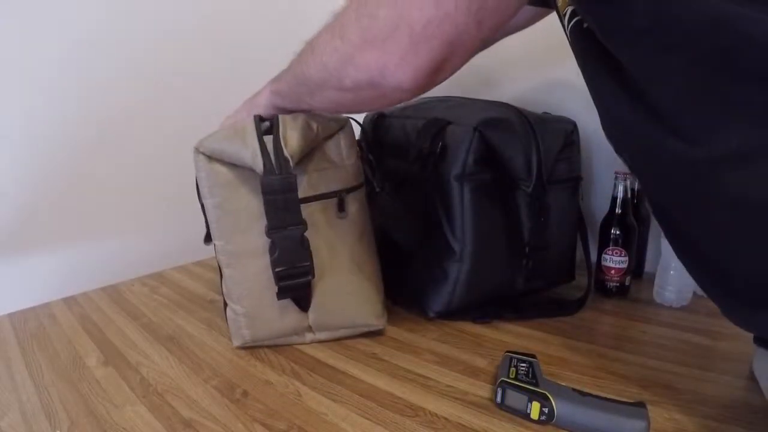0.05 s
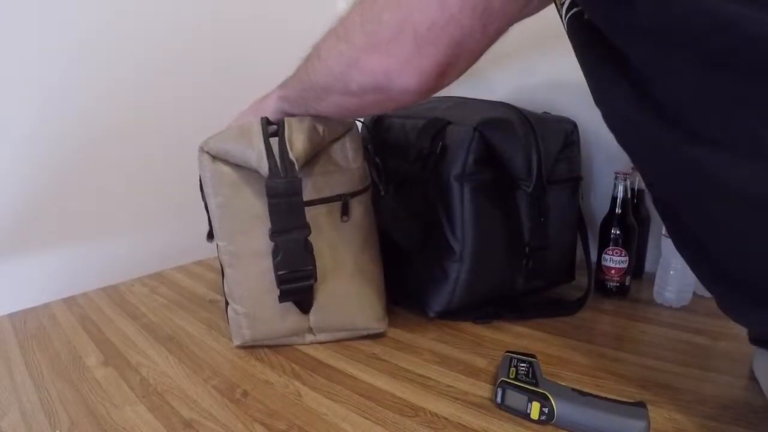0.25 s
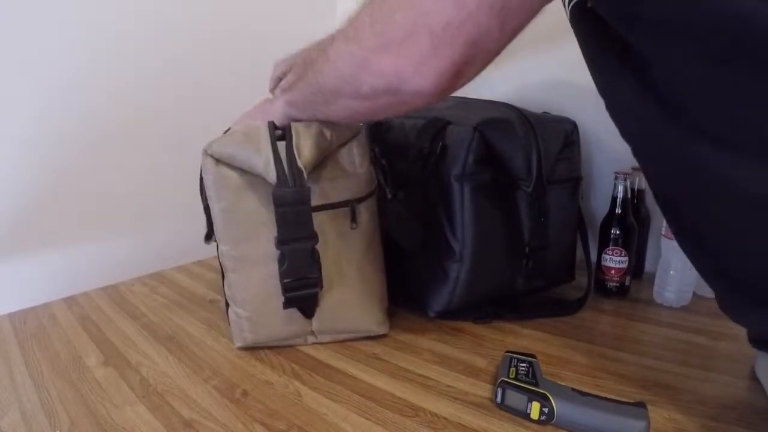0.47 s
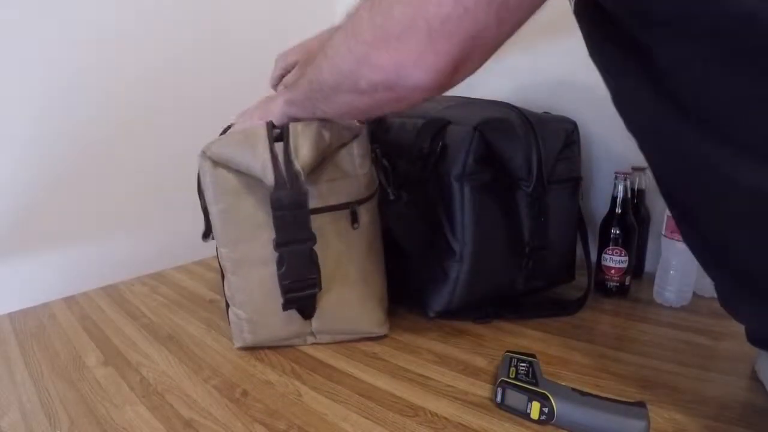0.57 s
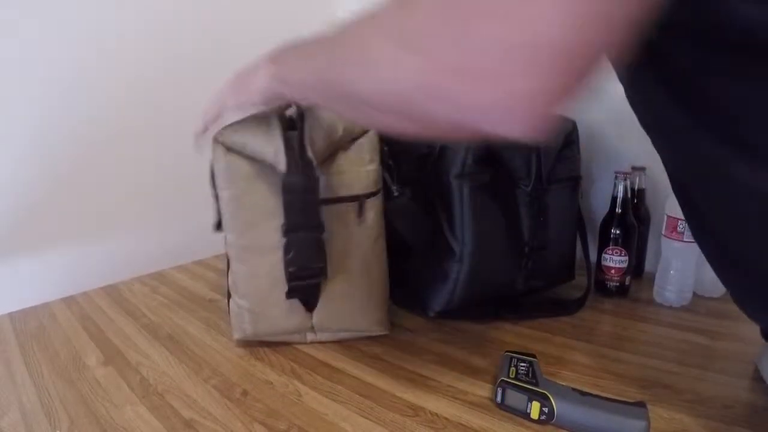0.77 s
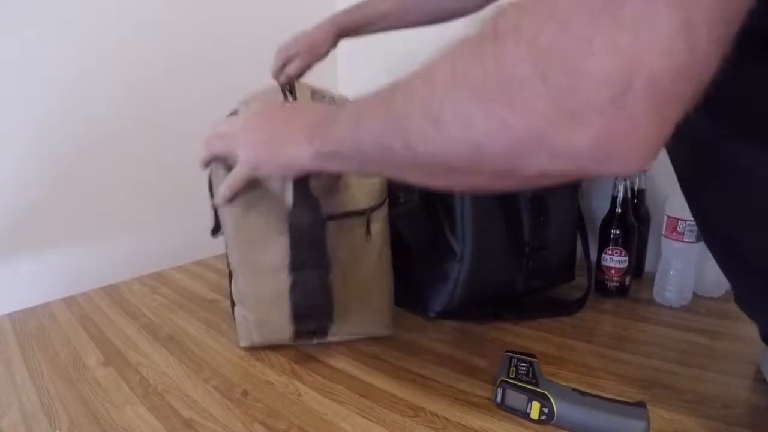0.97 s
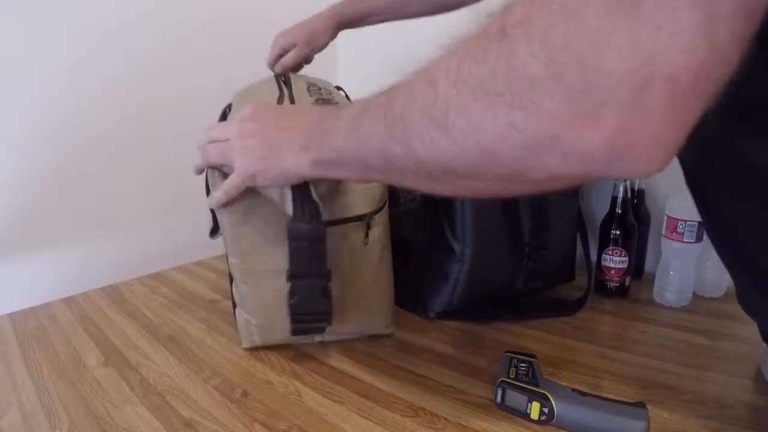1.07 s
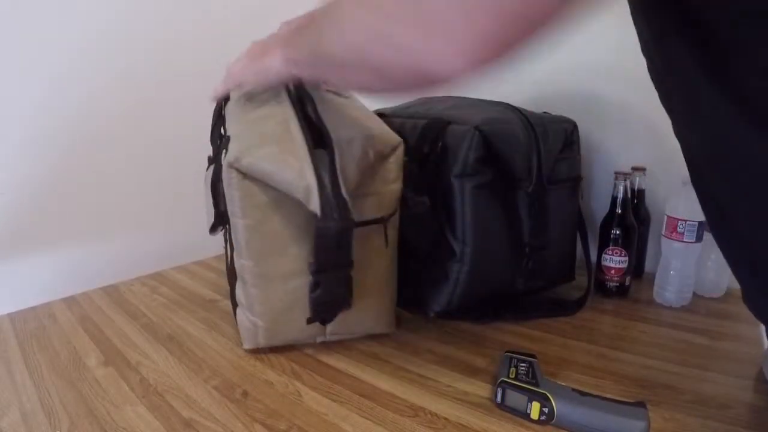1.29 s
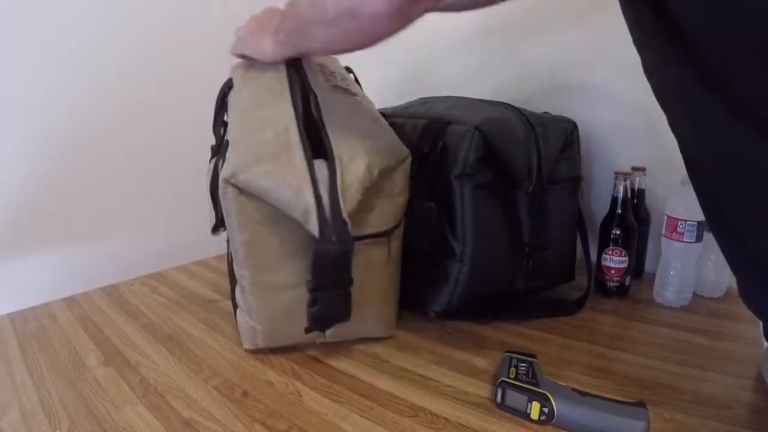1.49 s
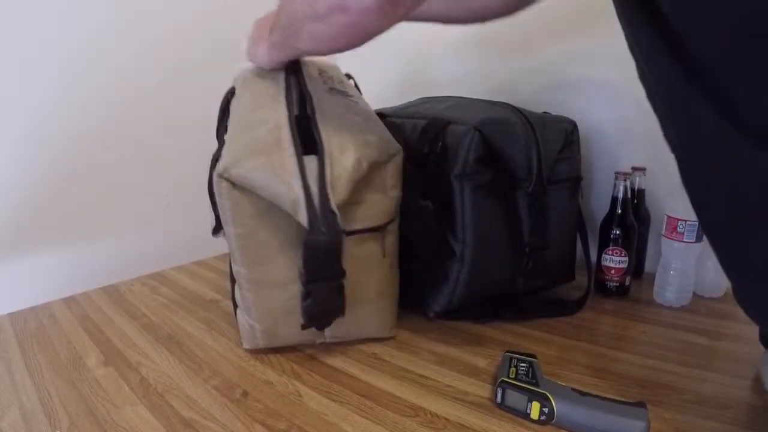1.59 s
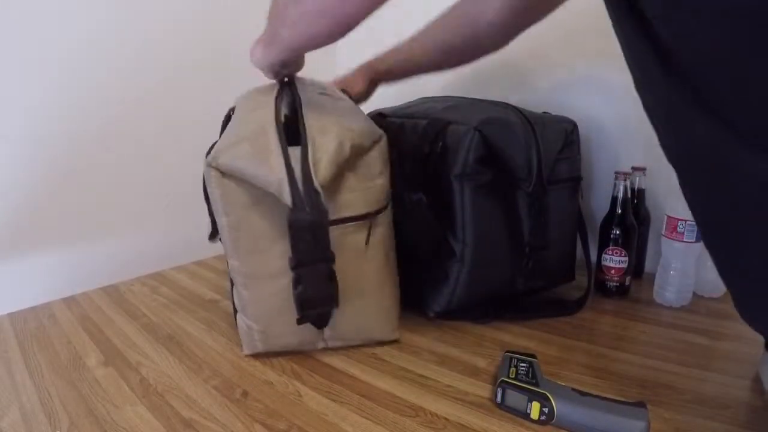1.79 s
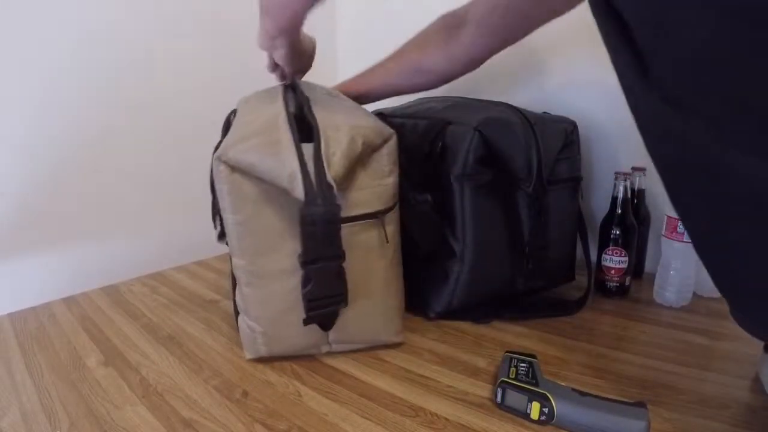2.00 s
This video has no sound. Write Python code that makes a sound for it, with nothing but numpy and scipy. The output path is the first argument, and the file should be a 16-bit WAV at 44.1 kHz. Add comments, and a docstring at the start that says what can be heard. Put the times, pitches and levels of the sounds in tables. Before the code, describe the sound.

Stiff bag fabric rustles and creases under hands; the base judders loudly across a wooden table, then soft knocks, small zipper ticks and one sharp buckle click, close mono microphone in a small bare room.

```python
"""A wooden table in a small bare room: hands press and drag a stiff soft-cooler across it, and a small
camera stands close by on the same table-top, its one microphone hearing everything in mono.
The wood carries sway, rocking, dragging, judders and dull knocks, made of resonant noise and sine modes.
Fabric rustles and creases in filtered grains and noise; zipper ticks and a buckle click ring as short modes,
a noisy tail fades after the click, and thin squeaks, a tiny rattle, room hiss and two faint tones join."""
import sys
import numpy as np
from scipy import signal
from scipy.fft import rfft, irfft
from scipy.io import wavfile
from scipy.ndimage import uniform_filter1d

SR = 44100
rng = np.random.default_rng(int(sys.argv[2]) if len(sys.argv) > 2 else 0)


def to_wav(sig):
    """Store sig (one row per channel, or 1-D mono) as 16-bit WAV at the path in sys.argv[1].

    Samples outside -1..1 are clipped; the rate is SR.
    """
    pcm = np.clip(np.atleast_2d(sig), -1, 1) * 32767
    pcm = np.round(pcm).astype(np.int16)
    wavfile.write(sys.argv[1], SR, pcm.T)  # frames by channels


def field_ratio(decibels):
    """Amplitude ratio for a level in dB (20 dB per decade); scalars and array-likes work."""
    return 10 ** (np.asarray(decibels, dtype=float) / 20)


N = 90404  # length [samples]


def col(table, k):
    """Column k of a time table as a per-sample curve."""
    a = np.array(table, float)
    return np.interp(np.arange(N) / SR, a[:, 0], a[:, k])


def unit(x):
    """Scale to rms 1."""
    return x / np.sqrt(np.mean(x ** 2))


def band(x, hz, width):
    """Two-pole resonance."""
    return signal.lfilter(*signal.iirpeak(min(hz, .45 * SR), max(hz / width, .3), SR), x)


def noise_band(hz, width):
    """Steady noise through the same resonance twice, rms 1."""
    return unit(band(band(rng.standard_normal(N), hz, width), hz, width))


def walk(rate):
    """Smooth random curve, spread 1, with a new target rate times a second."""
    k = int(SR / rate)
    steps = np.repeat(rng.standard_normal(N // k + 1), k)
    return unit(uniform_filter1d(uniform_filter1d(steps, k), k)[:N])


def grains(per_s, spread_db):
    """Random clicks of both signs with a long-tailed but bounded size, rms 1."""
    happens = rng.random(N) < per_s / SR
    size = field_ratio(spread_db * np.minimum(rng.exponential(size=N), 2.5))
    return unit(happens * np.sign(rng.standard_normal(N)) * size)


def add(out, s, x):
    """Mix x in at time s."""
    i = int(s * SR)
    out[i:i + len(x)] += x[:N - i]


def ring(hz, t60, rise=0.):
    """A decaying mode, starting downwards, faded in over rise seconds."""
    t = np.arange(int(t60 * SR)) / SR
    decay = np.exp(-np.log(1000) * t / t60)
    return -np.sin(2 * np.pi * hz * t) * decay * np.minimum(t / (rise + 1e-9), 1)


def trains(rows):
    """Short tones that swell and fade, each slightly off its nominal pitch."""
    out = np.zeros(N)
    for (centre, length, db, hz), c in zip(rows, rng.standard_normal(len(rows))):
        t = np.arange(int(length * SR)) / SR
        phase = 2 * np.pi * hz * (1 + 0.0048 * c) * (t - length / 2)
        swell = np.sin(np.pi * t / length) ** 1.5
        add(out, centre - length / 2, field_ratio(db) * swell * np.cos(phase))
    return out


def ring_contacts(contacts, modes):
    """Metal contacts that each ring every mode, with level, pitch and sign a little different each time."""
    out = np.zeros(N)
    for s, db in contacts:
        for hz, mode_db, t60 in modes:
            a, b = rng.standard_normal(2)
            mode = ring(hz * (1 + .012 * b), t60, rise=.0002)
            add(out, s, np.sign(b) * field_ratio(db + mode_db + 1.5 * a) * mode)
    return out


# quiet air of the room at the microphone: (frequency [Hz], relative level per Hz [dB])
HISS_SPECTRUM = [(35, -30), (60, 25), (145, -4), (167, -22), (546, -14.5), (738, -41.5), (1350, -24),
                 (1520, -16.5), (4850, -18), (15500, -22.5)]
HISS_DB = -72  # rms of the part above 1 kHz


def room_hiss():
    """Steady room noise, shaped as a spectrum read on a log frequency axis."""
    f = np.fft.rfftfreq(N, 1 / SR) + 1  # 1 Hz offset keeps the log finite
    hz, db = np.array(HISS_SPECTRUM, float).T
    shape = field_ratio(np.interp(np.log(f), np.log(hz), db)) * (f > 50)
    spectrum = rfft(rng.standard_normal(N)) * shape
    upper = irfft(spectrum * (f > 1000), N)
    return irfft(spectrum, N) / np.sqrt(np.mean(upper ** 2)) * field_ratio(HISS_DB)


# two faint tones in the background: (frequency [Hz], rms level [dB])
WHINE_TONES = [(8629, -87), (8662, -87.5)]


def whine():
    """Two steady sines close enough in pitch to beat."""
    t = np.arange(N) / SR
    return sum(np.sqrt(2) * field_ratio(db) * np.sin(2 * np.pi * hz * t) for hz, db in WHINE_TONES)


# table sway under the hands: (time [s], level [dB])
SWAY_LEVEL = [(0, -35.5), (.04, -47.5), (.15, -45), (.19, -47), (.3, -52), (.37, -45.5), (.51, -42),
              (.62, -52), (.66, -49), (.99, -57), (1.06, -50.5), (1.1, -52.5), (1.14, -50), (1.3, -52.5),
              (1.4, -60), (1.44, -50), (1.47, -61), (1.7, -51), (1.74, -63), (1.82, -48.5), (1.99, -56),
              (2.05, -54.5)]
# low resonances of the swaying table: (frequency [Hz], width [Hz], relative level [dB])
SWAY_RESONANCES = [(25.9, 8.7, 4), (51.8, 17.2, -3), (71.5, 20.5, -17)]


def table_sway():
    """The hands' pushing as noise in the table's lowest resonances."""
    sway = unit(sum(field_ratio(db) * noise_band(hz, width) for hz, width, db in SWAY_RESONANCES))
    return sway * field_ratio(col(SWAY_LEVEL, 1))


# bag dragging on the table-top: (time [s], level [dB], extra level of the low modes [dB])
DRAG_LEVEL = [(0, -67, 7.5), (.18, -65, 10), (.21, -53, 9), (.255, -62, 0), (.27, -51, 1), (.31, -45, 0.5),
              (.42, -47.5, -1.5), (.47, -40, -11), (.5, -30.5, -7.5), (.53, -38.5, -3), (.57, -40.5, -4),
              (.61, -44, 0), (.66, -45, -3.5), (.72, -57.5, 7.5), (.77, -50.5, -2.5), (.86, -55, 8),
              (.94, -54.5, -0.5), (.97, -51, 6), (1.07, -53, 1.5), (1.11, -64.5, 12.5), (1.16, -54.5, 1.5),
              (1.21, -56.5, 2), (1.25, -64, -1), (1.39, -70, 12), (1.42, -57.5, 13), (1.5, -58, 4.5),
              (1.6, -57, -7), (1.63, -57.5, 9), (1.72, -55, 2), (1.77, -64, 7), (1.84, -59, 10.5),
              (1.93, -64.5, 6.5), (1.99, -64.5, 9.5), (2.05, -52, 2)]
# lowest modes of the wood: (frequency [Hz], width [Hz], relative level [dB])
LOW_WOOD_MODES = [(104.8, 17.5, -7.5), (164.8, 32.3, -9)]
# higher modes of the table-top: (frequency [Hz], width [Hz], relative level [dB])
TOP_WOOD_MODES = [(245.6, 45, -2.5), (330, 177, -5.5), (400.8, 53, -2), (476.3, 34.6, -10), (626, 89, -18)]
DRAG_PER_S, DRAG_SPREAD_DB = 900, 2.5  # grains per second, spread of their size


def wood_modes(rubbing, rows):
    """The rubbing heard through a row of wood modes of alternating sign."""
    out = np.zeros(N)
    for k, (hz, width, db) in enumerate(rows):
        mode = unit(band(band(rubbing, hz, width), hz, 3 * width))
        out += (-1) ** k * field_ratio(db) * mode
    return out


def dragging():
    """Friction grains and noise exciting the modes of the table-top."""
    rubbing = grains(DRAG_PER_S, DRAG_SPREAD_DB) + 0.41 * rng.standard_normal(N)
    low = field_ratio(col(DRAG_LEVEL, 2)) * wood_modes(rubbing, LOW_WOOD_MODES)
    return field_ratio(col(DRAG_LEVEL, 1)) * (wood_modes(rubbing, TOP_WOOD_MODES) + low)


# fabric rustle: (time [s], level before tilt [dB], low tilt [dB], high tilt [dB]);
# the low tilt sets in below 2 kHz, full by 1 kHz; the high one above 3.5 kHz, full by 7 kHz
RUSTLE_LEVEL = [(0, -64.5, -0.5, 11), (.11, -67.5, 0, 7), (.28, -64, -1, 0), (.46, -61.5, 6, 0),
                (.48, -56.5, 13.5, -12), (.505, -46, 8, -21), (.53, -47.5, 6, -18), (.58, -53.5, 6, -10),
                (.63, -58, 0, -3), (.7, -56.5, -2.5, -0.5), (.75, -59, -5, 4), (.775, -57, 4, -4),
                (.82, -59.5, -0.5, -5), (.845, -53.5, -0.5, 0), (.87, -58, -4, -1), (.95, -61, 0, 0),
                (1.0, -54, -0.5, -2), (1.05, -57.5, -4, 1), (1.08, -56.5, -9.5, 0), (1.12, -66, 0, 4),
                (1.16, -59.5, -0.5, 3), (1.21, -56.5, -11, -2), (1.24, -64.5, -3.5, 4),
                (1.4, -67.5, 4, 5.5), (1.44, -57.5, -5.5, 7.5), (1.5, -58, -4, 5), (1.53, -63.5, -1, 9.5),
                (1.605, -64, 5.5, 2), (1.62, -51.5, -6, -9), (1.66, -55.5, -7.5, 3), (1.72, -58, -5, -0.5),
                (1.88, -59, -5, 3), (1.95, -63.5, -1, 1.5), (2.0, -64.5, -1, 5), (2.05, -56, -5, 1)]
# colour of the rubbed fabric: (frequency [Hz], relative level per Hz [dB])
FABRIC_COLOUR = [(600, 8.5), (1200, 6), (1800, -1), (2700, 5), (3600, -4.5), (5000, 4.5), (6300, -17),
                 (8000, -11.5), (11000, -19), (15000, -19)]
CRINKLES_PER_S, CRINKLE_SPREAD_DB = 1300, 2.5  # grains per second, spread of their size
CRINKLE_SHARE = 0.18  # share of the power that is grains; the rest is friction hiss
FLICKER_DB = 1.0  # random movement of each band's level


def fabric_rustle():
    """Crinkle grains and friction hiss in bands a third of an octave apart."""
    crinkles = np.sqrt(CRINKLE_SHARE) * grains(CRINKLES_PER_S, CRINKLE_SPREAD_DB)
    colour_hz, colour_db = np.array(FABRIC_COLOUR, float).T
    low_tilt, high_tilt = col(RUSTLE_LEVEL, 2), col(RUSTLE_LEVEL, 3)
    out = np.zeros(N)
    for hz in 700 * 2 ** np.arange(0, 4.5, 1 / 3):
        rub = crinkles + np.sqrt(1 - CRINKLE_SHARE) * rng.standard_normal(N)
        tilt = low_tilt * np.clip(np.log2(2000 / hz), 0, 1) + high_tilt * np.clip(np.log2(hz / 3500), 0, 1)
        # a band of constant relative width gathers more power higher up
        colour = np.interp(np.log(hz), np.log(colour_hz), colour_db) + 10 * np.log10(hz / 1000)
        level = colour + tilt + FLICKER_DB * walk(24.66)
        out += field_ratio(level) * unit(band(band(rub, hz, hz / 3), hz, hz / 2))
    return unit(out) * field_ratio(col(RUSTLE_LEVEL, 1))


# one shove sets the table rocking: (time [s], level before decay [dB], frequency [Hz], t60 [s])
ROCKING = (.192, -26.5, 33, .58)


def shove():
    """The table rocks as one low decaying mode, starting upwards."""
    out = np.zeros(N)
    s, db, hz, t60 = ROCKING
    add(out, s, -field_ratio(db) * ring(hz, t60, rise=.012))
    return out


# sharp creases of the fabric: (time [s], peak level [dB], centre frequency [Hz], length [s])
CREASE_EVENTS = [(0.294, -53, 794, 0.0055), (.431, -52, 1200, 0.0031), (.477, -45.5, 2300, 0.006),
                 (.486, -37, 2390, 0.027), (.503, -37.5, 2900, .009), (.5, -31, 930, 0.014),
                 (.517, -45, 1320, 0.016), (0.769, -44.5, 1450, 0.0066), (.790, -46, 3500, 0.0021),
                 (.801, -53, 4000, .003), (.831, -54, 5000, 0.0036), (0.844, -46.5, 4160, 0.0031),
                 (0.8414, -45, 2360, 0.0029), (.932, -50, 3500, 0.0025), (1.158, -54, 2000, 0.0045),
                 (1.208, -67, 3000, 0.0033)]


def fabric_creases():
    """Each crease is a short decaying noise burst in one broad resonance."""
    out = np.zeros(N)
    for s, db, hz, length in CREASE_EVENTS:
        n = int(3 * length * SR)
        snap = rng.standard_normal(n) * np.exp(-3 * np.arange(n) / SR / length)
        burst = band(band(snap, hz, .5 * hz), hz, .6 * hz)
        add(out, s, field_ratio(db) * burst / np.abs(burst).max())
    return out


# softer judders in the table: (centre time [s], length [s], peak level [dB], nominal frequency [Hz])
SOFT_JUDDERS = [(.455, 0.051, -33, 108.5), (.535, 0.058, -35.5, 254), (.54, 0.034, -34.5, 130),
                (.58, 0.019, -31.5, 92.6), (.59, 0.014, -29.5, 330)]


def soft_judders():
    """Brief low slip trains that swell and fade."""
    return trains(SOFT_JUDDERS)


# bag base skipping over the table-top: (time [s], level of the fundamental [dB], slip rate [Hz])
HARD_JUDDER = [(.474, -48, 397), (.478, -23.5, 402), (.4835, -24.5, 356.5), (.4865, -42, 407),
               (.490, -20.5, 425), (.494, -15, 371.6), (.4985, -13.5, 362), (.502, -16.5, 431.5),
               (.508, -20.5, 472), (.511, -23.5, 450), (.516, -34, 420), (.52, -58, 400)]
# overtones of the skipping, second harmonic upward: (relative level [dB], ..)
OVERTONES_DB = (-37.5, -27.5)


def hard_judder():
    """One strong slip train whose rate and size move."""
    t = np.arange(N) / SR
    begin, end = HARD_JUDDER[0][0], HARD_JUDDER[-1][0]
    phase = 2 * np.pi * np.cumsum(col(HARD_JUDDER, 2) * (t > begin)) / SR
    slip = np.sin(phase)
    for harmonic, db in enumerate(OVERTONES_DB, 2):
        slip = slip + field_ratio(db) * np.sin(harmonic * phase)
    return slip * field_ratio(col(HARD_JUDDER, 1)) * (t > begin) * (t < end)


# dull knocks through the table: (time [s], level before decay [dB], frequency [Hz], t60 [s])
KNOCK_EVENTS = [(0.5178, -39.5, 250, 0.058), (.7365, -28, 237, 0.039), (0.7426, -23.5, 195, 0.016),
                (.768, -31.5, 553, 0.017), (0.844, -34.5, 390, .02), (0.961, -38, 250, .03),
                (1.072, -31.5, 295, 0.019), (1.4072, -35, 193, 0.043), (1.477, -37.5, 291, 0.036),
                (1.611, -26, 208, 0.014), (1.651, -32, 220, 0.026), (1.687, -32, 270, 0.033),
                (1.986, -36.5, 294, 0.019)]


def knocks():
    """Each knock rings one quickly damped mode of the wood."""
    out = np.zeros(N)
    for s, db, hz, t60 in KNOCK_EVENTS:
        add(out, s, field_ratio(db) * ring(hz, t60, rise=0.0013))
    return out


# thin squeaks and one tiny high rattle just after the click:
# (centre time [s], length [s], peak level [dB], nominal frequency [Hz])
SQUEAKS_AND_RATTLE = [(.857, .016, -55, 5850), (1.449, .016, -56, 2100), (1.435, .02, -58, 2600),
                      (1.63, .005, -60, 12900), (2.04, .025, -66, 12400)]


def squeaks_and_rattle():
    """Thin squeaks and one tiny high rattle, each a short tone that swells and fades."""
    return trains(SQUEAKS_AND_RATTLE)


# zipper pull ticks: (time [s], level [dB])
TICK_EVENTS = [(1.0122, -46), (1.0135, -38), (1.0147, -43.5), (1.0612, -38.5), (1.1373, -52)]
# nominal ringing of the zipper metal: (frequency [Hz], relative level [dB], t60 [s])
ZIPPER_MODES = [(2500, -6, .01), (3600, 0, .013), (4500, -7, .008)]


def zipper_ticks():
    """The zipper pull rings a few short metal modes at each tick."""
    return ring_contacts(TICK_EVENTS, ZIPPER_MODES)


# latch contacts of the buckle click: (time [s], level [dB])
LATCH_CONTACTS = [(1.6096, -40), (1.6101, -53), (1.6108, -43.5), (1.6114, -38), (1.6119, -35),
                  (1.6123, -45), (1.6131, -38.5)]
# nominal ringing of the buckle: (frequency [Hz], relative level [dB], t60 [s])
BUCKLE_MODES = [(1300, -8, .006), (2920, -8, .005), (4550, 0, .006), (5000, 0, .005), (5500, -1, .006),
                (6800, -8, .005), (8200, -14, .004), (9650, -11, .01), (12900, -16, .007)]


def buckle_click():
    """A rapid run of latch contacts, each ringing the buckle's modes."""
    return ring_contacts(LATCH_CONTACTS, BUCKLE_MODES)


def room(x):
    """Adds the diffuse tail of a small bare room: decaying noise after a short gap."""
    t60_s, tail_db, gap_s = .35, -13, .006
    t = np.arange(int(.6 * SR)) / SR
    tail = rng.standard_normal(len(t)) * np.exp(-np.log(1000) * t / t60_s) * (t > gap_s)
    tail = tail / np.sqrt(np.sum(tail ** 2))
    return x + field_ratio(tail_db) * signal.fftconvolve(x, tail)[:N]


# high bands of the noisy tail after the click: (frequency [Hz], width [Hz], starting rms level [dB])
TAIL_BANDS = [(4680, 600, -58), (5600, 800, -61), (9650, 500, -68.5), (12900, 600, -73)]


def click_tail():
    """A noisy tail fades after the click, in a few high bands."""
    start_s, t60_s = 1.616, 0.46
    t = np.arange(N) / SR - start_s
    fade = (t > 0) * np.exp(-np.log(1000) * np.maximum(t, 0) / t60_s)
    return fade * sum(field_ratio(db) * noise_band(hz, width) for hz, width, db in TAIL_BANDS)


def scene():
    """Everything at the one microphone; room() is applied to the small hard sounds only."""
    background = room_hiss() + whine()
    wood = table_sway() + dragging() + shove() + soft_judders() + hard_judder() + knocks()
    fabric = fabric_rustle() + fabric_creases()
    hardware = room(squeaks_and_rattle() + zipper_ticks() + buckle_click()) + click_tail()
    return (background + wood + fabric + hardware)[None]


def roll_off(x):
    """The treble ends steeply here."""
    return signal.sosfilt(signal.butter(12, 15750, fs=SR, output="sos"), x)


def record(dry):
    """The camera cuts the top steeply above 15.35 kHz."""
    top_cut = signal.ellip(8, .2, 60, 15350, fs=SR, output="sos")  # order, ripple dB, stop dB, edge Hz
    mix = signal.sosfilt(top_cut, dry)
    return roll_off(mix)


dry = scene()
out = record(dry)
to_wav(out)
```